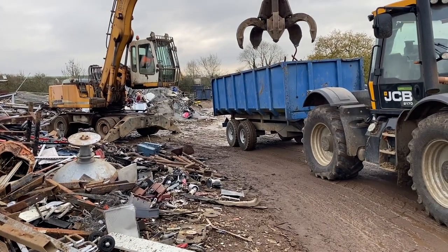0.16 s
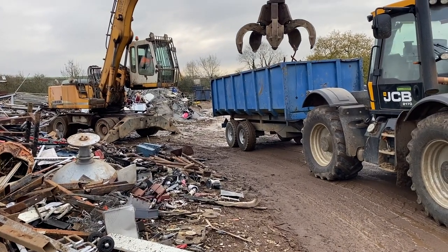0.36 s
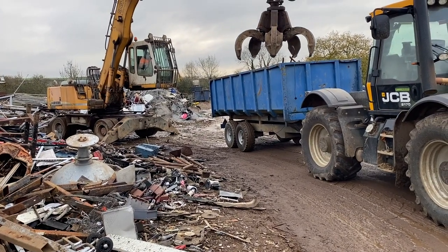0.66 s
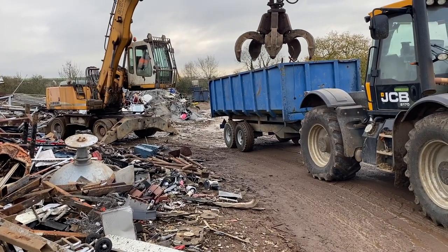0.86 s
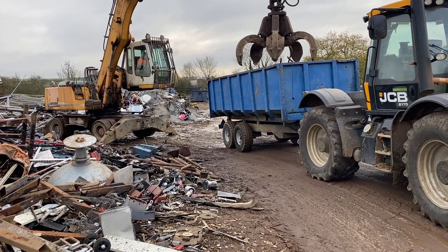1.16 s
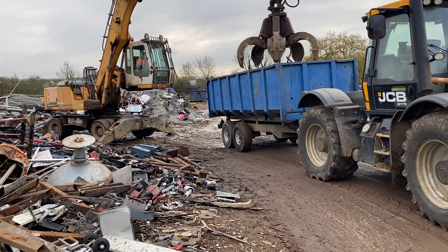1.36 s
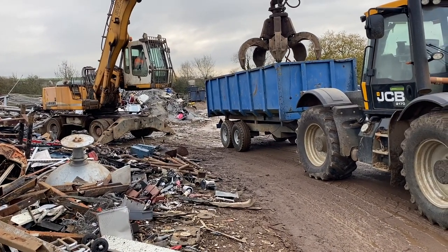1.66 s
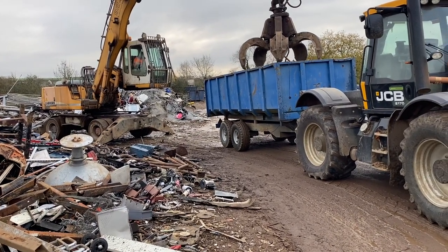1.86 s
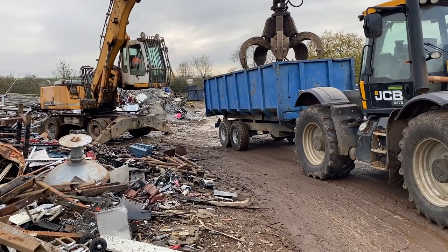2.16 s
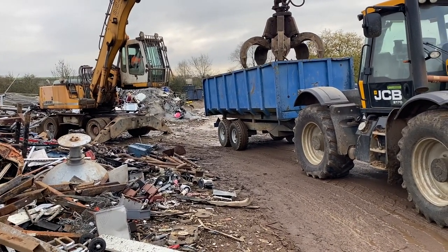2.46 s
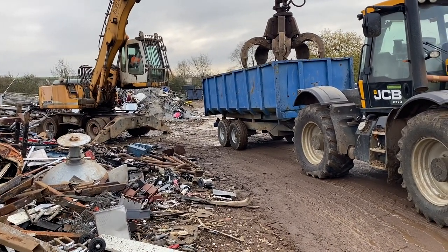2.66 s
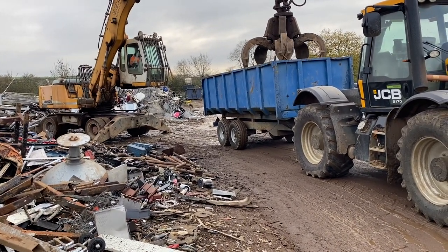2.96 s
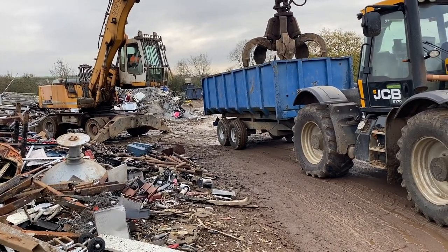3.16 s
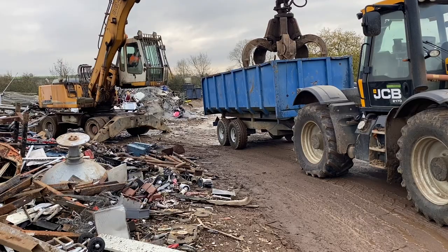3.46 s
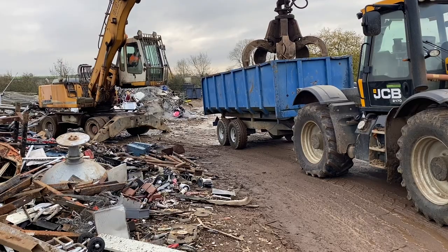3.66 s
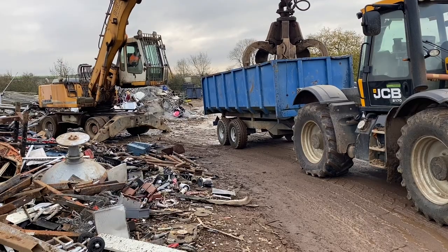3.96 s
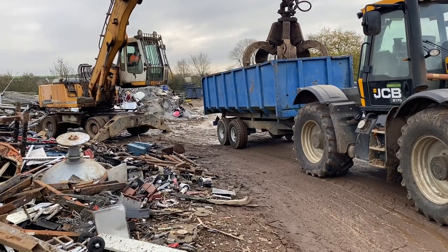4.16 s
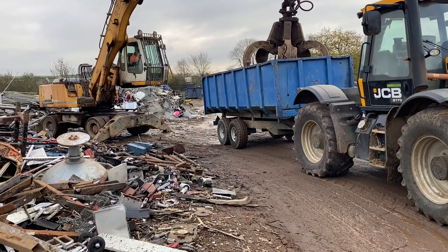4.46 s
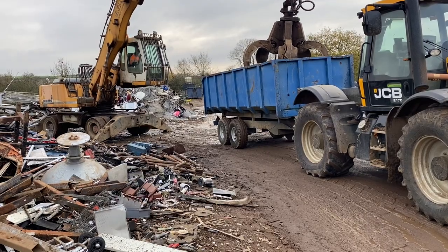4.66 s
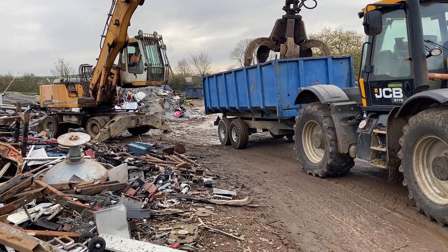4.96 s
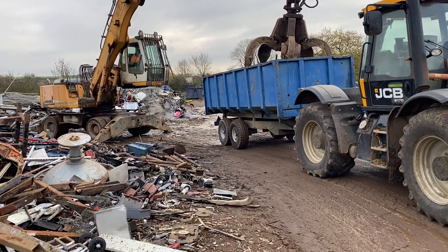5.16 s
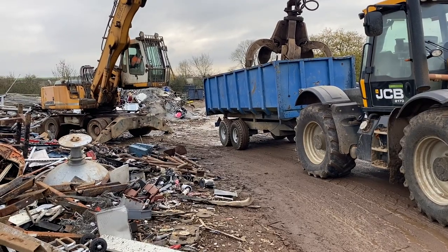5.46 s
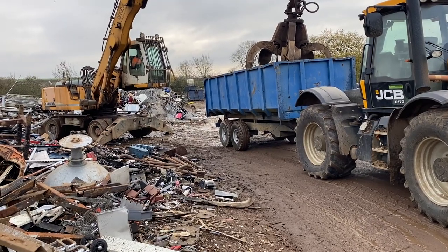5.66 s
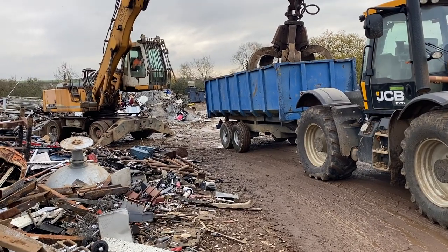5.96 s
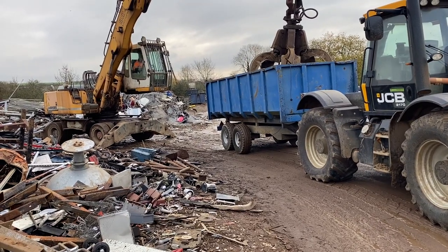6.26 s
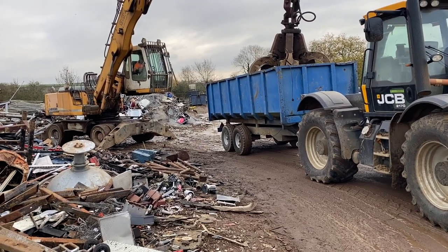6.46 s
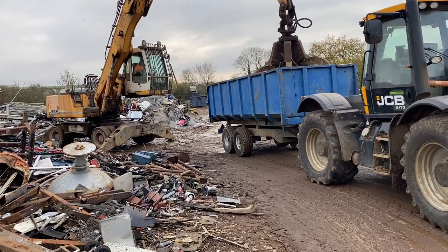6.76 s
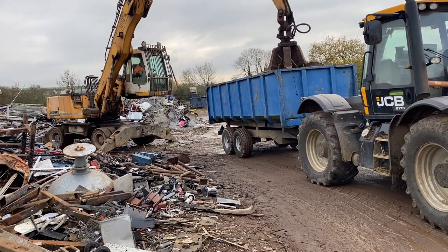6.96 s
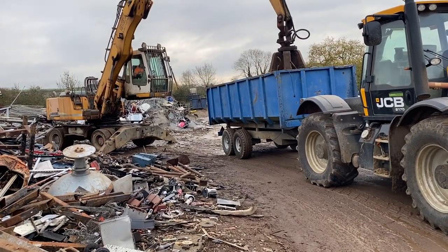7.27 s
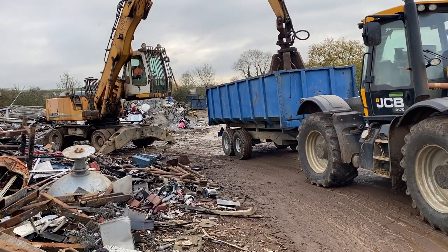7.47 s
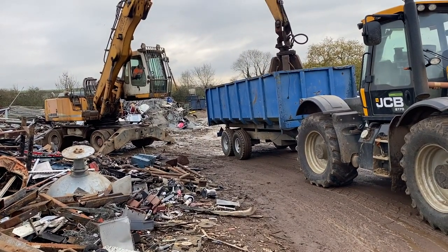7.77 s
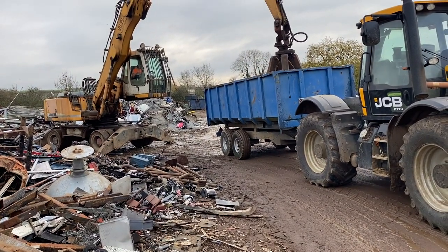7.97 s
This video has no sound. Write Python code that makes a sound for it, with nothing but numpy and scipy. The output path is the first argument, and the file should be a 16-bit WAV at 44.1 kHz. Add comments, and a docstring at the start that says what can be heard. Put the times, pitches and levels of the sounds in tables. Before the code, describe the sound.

A diesel tractor idles close by with a steady rumble and ticking clatter, and an excavator drones further off. After about three seconds a grab starts digging in a steel trailer, bringing hollow booms and dull clanks. The metal then groans, scrapes and crashes, and loose scrap jangles and tumbles through the last seconds. The open scrap yard adds only a short, dull echo.

```python
"""An open scrap yard. Close by on the right a six-cylinder diesel tractor idles, its knocks, ticks and
clatter repeating with each engine cycle. Further off an excavator drones while its grab digs in a steel
trailer: the body booms, pieces clank, snap and scrape, dragged steel groans, and scrap shifts and
tumbles. The yard answers the scrap with a short, dull tail."""
import sys
import numpy as np
from scipy import signal
from scipy.fft import rfft, irfft, next_fast_len
from scipy.io import wavfile
from scipy.ndimage import uniform_filter1d, map_coordinates

SR = 44100
rng = np.random.default_rng(int(sys.argv[2]) if len(sys.argv) > 2 else 0)


def materialize(psi):
    """Save the field psi as 16-bit PCM at rate SR to the path in sys.argv[1].

    A 1-D psi becomes a single channel; in a 2-D psi each row is a channel.
    """
    bounded = np.clip(np.atleast_2d(psi).T, -1, 1)
    quanta = np.round(bounded * 32767).astype(np.int16)
    wavfile.write(sys.argv[1], SR, quanta)


N = 357210

# stereo noise, opposed part against common part: freq_hz, level_db
SIDE_SPECTRUM = [(60, -18), (130, -14.5), (300, -16), (600, -5), (2000, -9.5), (8000, -1)]
# yard decay: freq_hz, t60_s
YARD_DECAY = [(150, 0.75), (1500, 0.26), (9000, 0.15)]

# excavator engine speed: time_s, firing_hz
EXCAVATOR_SPEED = [(0, 100.3), (.5, 100.45), (1.3, 99.7), (2.1, 98.8), (3, 99.5), (3.6, 100.35),
                   (4.4, 99.25), (5, 99.35), (5.5, 100.6), (5.9, 99.6), (6.3, 100.5), (7.2, 100.8),
                   (7.8, 98.9), (8.1, 98.9)]
# nine-piston pump, tone and octave: level_db
HYDRAULIC_LEVELS = [-43, -43.5]
# excavator fans: pitch_hz, level_db, wander_hz
FAN_HUMS = [(54.66, -36.5, 0.34), (117.2, -34.5, 0.28)]

# trailer takes a load: start_s, level_db, panel_over_chassis_db
BOOM_HITS = [(1.36, -26.5, -4), (3.082, -18.5, -10.5), (3.50, -15, -8), (3.569, -21, -21), (4.029, -22, -7),
             (4.43, -21, -6), (5.091, -22, -5.5), (5.56, -16, -4.5), (5.62, -16, -12), (6.379, -16.5, -6.5),
             (6.46, -24, -17), (6.57, -20.5, -4), (6.96, -17.5, 0), (7.73, -14, -6), (8.02, -20.5, -1)]
# trailer chassis: pitch_hz, width_hz, level_db
CHASSIS_MODES = [(53.7, 13.7, 10.5), (69.1, 15.6, 12)]
# trailer side panels: pitch_hz, width_hz, level_db
PANEL_MODES = [(117, 52, 17.5), (161, 51, 9), (200, 16, -42), (276, 44, 11)]
# steel drags on steel: start_s, panel_hz, level_db
GROAN_DRAGS = [(4.755, 161, -24.5), (4.9, 435, -28.5), (5.47, 366, -35), (5.839, 406, -18.5),
               (5.879, 234, -24), (6.012, 413, -27), (6.422, 138, -23), (6.9, 183, -20.5),
               (7.679, 222, -31)]
# scrap slides: middle_s, length_s, level_db
SCRAP_SLIDES = [(4.39, 0.12, -31.5), (5.02, 0.26, -36.5), (5.62, 0.24, -32), (5.89, 0.15, -26),
                (6.567, 0.22, -27), (6.835, 0.097, -24.5), (7.014, 0.33, -16.5), (7.688, 0.28, -17)]
# tumbling scrap, with treble filtered out near 9 and 13 kHz: freq_hz, density_db
HEAP_SPECTRUM = [(70, -28), (130, 2.5), (220, -4), (430, -1.5), (600, -11.5), (950, -8.5), (1500, -19.5),
                 (1950, -13.5), (3200, -24.5), (4500, -25.5), (7700, -36), (9000, -54), (12000, -39.5),
                 (13000, -70)]
# grit, with treble filtered out near 9 and 13 kHz: freq_hz, density_db
GRIT_SPECTRUM = [(1500, -25), (3000, -5), (4200, -1), (6000, -3), (7800, -3), (9200, -28), (11500, -18),
                 (12700, -55)]
# a tine scrapes, then slips off: slip_s, length_s, level_db
TINE_SCRAPES = [(5.853, 0.036, -31), (6.559, 0.057, -25.5)]
# scraping tine: freq_hz, density_db
RASP_SPECTRUM = [(300, -15), (1000, 3), (2000, 2), (4500, -14), (8000, -35), (15000, -55)]
# loose steel tube: pitch_hz, level_db, t60_s
TUBE_MODES = [(1574, -9, .35), (1815, -6, .3), (2040, -2, .42), (2205, -4, .36), (2490, -2.5, .34),
              (2616, -5, .36), (2939, -7, .32), (3245, -8, .36), (3690, -13, .3), (4270, -10, .28),
              (4810, -11.5, .26)]
# blows on the tube: start_s, level_db
TUBE_BLOWS = [(5.778, -38.5), (5.853, -31.5), (5.921, -35), (6.014, -32)]
# small hard pieces snap: start_s, level_db, t60_s
SNAP_HITS = [(4.35, -29, 0.24), (4.559, -41.5, 0.7), (5.503, -36, 0.065), (5.853, -30.5, .06),
             (6.207, -43, 0.63), (7.014, -27, 0.18), (7.277, -36, 0.11), (7.372, -20, 0.14)]
# snap, with treble filtered out near 9 and 13 kHz: freq_hz, density_db
SNAP_SPECTRUM = [(1500, -32), (3000, -8), (3700, -1.5), (4500, 1.5), (5500, -2.5), (6600, -2.5),
                 (7700, -1.5), (9000, -17.5), (11500, -10), (13000, -36), (15500, -23)]
# heavy pieces hit walls and plates: start_s, plate_hz, level_db
PLATE_HITS = [(3.497, 803, -32), (3.504, 520, -37), (3.598, 760, -36), (3.818, 1000, -35),
              (5.853, 900, -24), (6.4, 930, -24.5), (6.555, 995, -19.5), (6.557, 377, -23.5),
              (6.574, 1870, -23.5), (6.795, 950, -22.5), (6.814, 1010, -28), (6.869, 560, -42),
              (6.919, 990, -32), (6.984, 980, -25), (7.039, 1030, -34), (7.089, 814, -30),
              (7.189, 980, -30.5), (7.385, 437, -25.5), (7.534, 1300, -34), (7.599, 1220, -28),
              (7.679, 834, -25), (7.759, 680, -27), (7.821, 1210, -33)]
# steel walls and tines: pitch_hz, level_db, t60_s
STEEL_MODES = [(660, -13, 0.35), (756, -5, 0.3), (842, -5, 0.22), (1040, -8, 0.23), (1805, -5, 0.2),
               (1905, -2, 0.2), (1972, -1, 0.3), (2202, -5.5, 0.4), (2485, -0.5, 0.38), (2560, -6, 0.28),
               (3245, -5.5, 0.42), (3550, -10, 0.25), (4270, -6, 0.22), (4400, -8, 0.25), (4800, -13, 0.33),
               (5330, -15, 0.28), (6530, -17, 0.2)]
# scrap piece, with treble filtered out near 9 and 13 kHz: freq_hz, density_db
PIECE_SPECTRUM = [(100, -6), (200, 6.5), (400, 0.5), (550, -5), (950, 2), (1450, -2.5), (2000, 1),
                  (2900, -7.5), (4500, -10.5), (6000, -19.5), (7600, -21), (9000, -41), (11800, -30),
                  (13000, -69)]
# the grab knocks scrap about: start_s, level_db, treble_db
CLANK_HITS = [(3.499, -21.5, -28), (3.594, -20, -21), (3.819, -17.5, -19), (3.88, -22.5, -6),
              (4.571, -25, 6), (5.0, -21, -13), (5.471, -13.5, -28), (5.506, -19.5, -11),
              (5.557, -14.5, -33), (5.778, -15.5, -2), (5.852, -9.5, 3), (5.921, -18.5, 6),
              (6.014, -17.5, 4), (6.21, -27.5, 28), (6.402, -20.5, 7), (6.556, -3.5, -0.5), (6.565, -11, 2),
              (6.575, -8.5, -17), (6.797, -16, -20), (6.869, -16, -5), (6.983, -14, 9), (7.039, -15, 3),
              (7.087, -18, -6), (7.188, -16, -1), (7.535, -18, -1), (7.598, -13.5, 4), (7.679, -19, 14),
              (7.72, -10.5, 1), (7.822, -12.5, -6)]
# scrap bearing: freq_hz, left_minus_right_db
SCRAP_BALANCE = [(100, 0.0), (500, -2.0), (1000, -5.0), (2200, 1.0), (6000, 0.5)]

# tractor four-stroke cycle rate: time_s, cycle_hz
TRACTOR_SPEED = [(0, 6.25), (3, 6.25), (3.8, 6.205), (5, 6.22), (5.8, 6.25), (8.1, 6.255)]
# exhaust and block tones: cycle_rate_multiple
TONE_ORDERS = [6, 8, 12, 24, 35, 36, 42, 46, 48, 50, 54, 72]
# the same tones: level_db
TONE_LEVELS = [-37, -30.5, -29.5, -35.5, -50, -45.5, -48, -39.5, -33.5, -43.5, -44, -45]
# block rumble: freq_hz, density_db
RUMBLE_SPECTRUM = [(15, -29), (30, -14), (50, 4.5), (95, 11.5), (130, 1.5), (170, -3), (250, 0.5),
                   (340, -0.5), (460, -3.5), (560, -13.5), (740, -7), (830, -17.5), (1050, -9.5),
                   (1600, -101)]
# engine clatter, with treble filtered out near 9 and 13 kHz: freq_hz, density_db
CLATTER_SPECTRUM = [(300, -31), (700, 5), (1100, -3), (1600, 2), (2700, 1), (3600, -14), (5000, -9.5),
                    (6500, -15.5), (8000, -19.5), (8800, -29), (11800, -29.5), (12700, -69), (15500, -64)]
# engine hiss: freq_hz, density_db
HISS_SPECTRUM = [(200, -55), (700, -7), (830, -4.5), (1130, 4), (1500, -1), (2700, -7.5), (3600, -10.5),
                 (4300, -11.5), (5000, -15.5), (7500, -59), (12000, -56), (12700, -75)]
# fuel pump: pitch_hz, width_hz, level_db
FUEL_PUMP_MODES = [(2090, 69, 20), (2140, 170, -18)]
# bonnet panel: pitch_hz, width_hz, level_db
BONNET_MODES = [(293, 20, 0)]
# cylinders in firing order: knock_db, tick_db, clatter_db, knock_lag_cycles
CYLINDER_VOICES = [(-1.5, 9, 5, .045), (-4, -5, 2.5, .01), (1.5, 7, 7.5, .004), (4, -1, 4.5, .006),
                   (-3, 7.5, 6, 0), (-2, -3, 2, .045)]
# tractor bearing: freq_hz, left_minus_right_db
TRACTOR_BALANCE = [(70, -1.5), (180, -2.0), (300, -5.0), (600, 0.5), (1400, -3.5), (2500, 6.0),
                   (4400, 0.5), (7500, 0)]

GRIP_S = 6.16  # the grab grips the load
HALF_LEFT_RIGHT = np.array([[.5], [-.5]])


def amp(db):
    """Decibels to gain."""
    return 10 ** (np.asarray(db) / 20)


def unit(x):
    """Scale to rms 1."""
    return x / np.sqrt(np.mean(x ** 2) + 1e-20)


def along(points, hz):
    """Interpolate (freq_hz, value) points on a log axis."""
    point_hz, values = np.transpose(points)
    return np.interp(np.log(hz + 1), np.log(point_hz + 1), values)


def curve(rows):
    """(time_s, value) rows as one value per sample."""
    return np.interp(np.arange(N) / SR, *np.transpose(rows))


def wobble(rate_hz):
    """Smooth random curve, rate_hz knots a second."""
    knots = rng.standard_normal(int(N * rate_hz / SR) + 4)
    grid = np.arange(0, N, 64)
    return np.interp(np.arange(N), grid, map_coordinates(knots, [grid * rate_hz / SR]))


def fade(t, t60_s):
    """Exponential decay from t = 0."""
    return (t >= 0) * np.exp(-np.log(1000) * np.abs(t) / max(t60_s, 1e-3))


def rise(t, rise_s):
    """Exponential attack, complete after rise_s."""
    return 1 - fade(t, rise_s)


def filtered(x, response):
    """Apply a complex frequency response."""
    size = x.shape[-1]
    padded = next_fast_len(size + SR // 8, True)
    return irfft(rfft(x, padded) * response(np.fft.rfftfreq(padded, 1 / SR)), padded)[..., :size]


def coloured(x, spectrum):
    """Apply a (freq_hz, density_db) spectrum; rms 1."""
    return unit(filtered(x, lambda hz: amp(along(spectrum, hz))))


def resonate(x, modes):
    """Apply parallel (pitch_hz, width_hz, level_db) resonances; rms 1."""
    return unit(filtered(x, lambda hz: sum(
        amp(db) * 1j * hz * width_hz / (pitch_hz ** 2 - hz ** 2 + 1j * hz * width_hz)
        for pitch_hz, width_hz, db in modes)))


def bandpass(x, centre_hz, q):
    """Two equal resonances in series."""
    return filtered(x, lambda hz: 1 / (1 + 1j * (hz / centre_hz - centre_hz / (hz + 1)) * q) ** 2)


def stereo_noise(size, side_db):
    """A common part plus an opposed part that is weak in the bass."""
    mid, side = rng.standard_normal((2, size))
    side = filtered(side, lambda hz: amp(side_db + along(SIDE_SPECTRUM, hz)))
    return unit(np.array([mid + side, mid - side]))


def placed(x, balance, phase_rad):
    """Set left against right in level and phase, by frequency."""
    return filtered(x, lambda hz: amp(HALF_LEFT_RIGHT * along(balance, hz))
                    * np.exp(1j * HALF_LEFT_RIGHT * phase_rad(hz)))


def add(track, start_s, sound):
    """Mix a sound in at start_s."""
    part = track[..., max(round(start_s * SR), 0):][..., :sound.shape[-1]]
    part += sound[..., :part.shape[-1]]


def yard_echo(x):
    """Heaps and machines scatter a short, dull tail."""
    hz, t, bins = signal.stft(rng.standard_normal((2, SR // 2)), SR, nperseg=256)
    decay = np.exp(-np.log(1000) * t / along(YARD_DECAY, hz)[:, None])
    tail = signal.istft(bins * decay, SR, nperseg=256)[1]
    delayed = np.pad(tail / np.linalg.norm(tail[0]), ((0, 0), (SR // 60, 0)))
    return signal.oaconvolve(x, delayed, axes=1)[:, :N]


def excavator(load_db_per_hz=4):
    """Four-cylinder engine, pump and fans. Under load engine and pump sag and the pump tone grows."""
    tone = lambda hz: np.sqrt(2) * np.sin(2 * np.pi * np.cumsum(hz) / SR)
    firing_hz = curve(EXCAVATOR_SPEED)
    firing = amp(-25 + 1.25 * wobble(2.985)) * tone(firing_hz)
    piston_hz = firing_hz * 9 / 4 + .5 * wobble(7)
    pump_db, octave_db = HYDRAULIC_LEVELS
    load_db = load_db_per_hz * (firing_hz.mean() - firing_hz)
    pump = amp(pump_db + load_db + 1.3 * wobble(3.97)) * tone(piston_hz)
    octave = amp(octave_db + 1.3 * wobble(3.97)) * tone(2 * piston_hz)
    fans = sum(amp(db + 0.88 * wobble(7.2)) * tone(hz + wander_hz * wobble(5))
               for hz, db, wander_hz in FAN_HUMS)
    return (firing + pump + octave + fans) * amp(-HALF_LEFT_RIGHT)


def trailer_booms(t60_s=0.6):
    """Chassis and side panels boom under each load."""
    out, t = np.zeros((2, N)), np.arange(SR * 3 // 4) / SR
    for start_s, db, panel_db in BOOM_HITS:
        chassis = unit(sum(
            amp(mode_db) * np.sin(2 * np.pi * (hz + width_hz * rng.uniform(-0.51, 0.505)) * t)
            for hz, width_hz, mode_db in CHASSIS_MODES))
        panels = resonate(stereo_noise(len(t), side_db=-4), PANEL_MODES)
        panels = unit(filtered(panels, lambda hz: 1 / (1 + (hz / 450) ** 4)))
        boom = (chassis + amp(panel_db) * panels) * fade(t, t60_s) * rise(t, 0.088)
        add(out, start_s, amp(db + 3) * boom)
    return out


def panel_groans(slips_per_s=90):
    """Uneven slips of dragging steel drive one panel resonance; lower panels groan longer."""
    out = np.zeros((2, N))
    for start_s, panel_hz, db in GROAN_DRAGS:
        size = round(0.092 * np.sqrt(311 / panel_hz) * SR)
        travel = np.cumsum(rng.exponential(size=size + 1)) * slips_per_s / SR + rng.random()
        slips = np.diff(np.floor(travel)) * rng.standard_normal(size)
        friction = slips + amp(-32) * stereo_noise(size, side_db=6)
        swell = signal.windows.tukey(size, .8)
        add(out, start_s, amp(db) * unit(bandpass(friction, panel_hz, q=4)) * swell)
    return out


def struck_piece(t60_s, uneven_db):
    """Struck scrap: dense modes of uneven strength, the high ones dying first."""
    t = np.arange(SR // 2) / SR
    spectrum = rfft(stereo_noise(len(t), side_db=-4.5))
    strengths = amp(uneven_db * np.minimum(rng.standard_normal(len(t) // 2 + 1), 2))
    modes = unit(irfft(spectrum * strengths))
    low = filtered(modes, lambda hz: 1 / (1 + (hz / 3200) ** 2))
    return low * fade(t, t60_s) + (modes - low) * fade(t, 0.86 * t60_s)


def jangle(contacts_per_s=70, typical_hz=800):
    """Light pieces clank in turn, each with three modes at a pitch of its own."""
    out, t = np.zeros((2, N)), np.arange(SR // 6) / SR
    for slot, draws in enumerate(rng.standard_normal((int(contacts_per_s * N / SR), 9))):
        pitch, detune, force, jitter = draws[0], draws[1:4], draws[4], draws[5]
        phase_rad = .5 * draws[6:8, None]
        modes_hz = np.minimum(typical_hz * np.exp(.5 * pitch + .1 * detune) * [1, 1.6, 2.5], 7500)
        modes = sum(np.sin(2 * np.pi * hz * t + phase_rad) / np.hypot(1, hz / typical_hz)
                    for hz in modes_hz)
        ring = modes * fade(t, 0.24) * rise(t, .005) ** 2
        add(out, (slot + np.tanh(jitter)) / contacts_per_s, amp(5 * np.tanh(force)) * ring)
    return unit(out)


def scrap_motion(rest_db=-42.5, grip_db=-38, growth_db_per_s=5):
    """Envelope: the load stirs ever more as it is gripped and lifted; slides swell on top."""
    t = np.arange(N) / SR
    power = (amp(rest_db) + amp(grip_db + growth_db_per_s * (t - GRIP_S))) ** 2
    for middle_s, length_s, db in SCRAP_SLIDES:
        swell = 0.5 ** np.minimum((2 * (t - middle_s) / length_s) ** 2, 20)
        power += (amp(db) * swell) ** 2
    return np.sqrt(power)


def scrap_tumble(pieces=13, contacts_per_s=18):
    """Ringing pieces collide at random and merge into a coarse rush; grit trickles between them."""
    heap = np.zeros((2, N))
    for _ in range(pieces):
        ring = struck_piece(t60_s=0.17, uneven_db=10.5)
        contacts = rng.random(N) < contacts_per_s / SR
        forces = amp(2.8 * np.minimum(rng.exponential(size=N), 2.5))
        heap += signal.oaconvolve((contacts * forces)[None], ring, axes=1)[:, :N]
    grit = coloured(stereo_noise(N, side_db=1.5) * amp(3.9 * wobble(220)), GRIT_SPECTRUM)
    return scrap_motion() * (coloured(heap, HEAP_SPECTRUM) + amp(-9.5) * jangle() + amp(-19) * grit)


def tine_scrapes():
    """Rough sliding contact swells until the tine slips off."""
    out = np.zeros((2, N))
    for slip_s, length_s, db in TINE_SCRAPES:
        size = round(length_s * SR)
        roughness = amp(3 * unit(uniform_filter1d(rng.standard_normal(size), SR // 500)))
        rasp = coloured(stereo_noise(size, side_db=2) * roughness, RASP_SPECTRUM)
        add(out, slip_s - length_s, amp(db) * rasp * np.linspace(.2, 1, size) ** 2)
    return out


def tube_ring(detune_hz=22):
    """A dented tube is struck; its modes come in close pairs that beat."""
    out, t = np.zeros((2, N)), np.arange(SR * 3 // 4) / SR
    for start_s, db in TUBE_BLOWS:
        for hz, mode_db, t60_s in TUBE_MODES * 2:
            detune, phase, scatter_db = rng.standard_normal(3)
            turns = (hz + detune_hz * np.tanh(detune)) * t + phase
            mode = np.sin(2 * np.pi * turns + .5 * rng.standard_normal((2, 1)))
            add(out, start_s, amp(db + mode_db + scatter_db) * mode * fade(t, t60_s) * rise(t, 0.0075))
    return out


def snaps():
    """Small hard pieces crack, short and bright."""
    out, t = np.zeros((2, N)), np.arange(SR // 3) / SR
    for start_s, db, t60_s in SNAP_HITS:
        crack = coloured(stereo_noise(len(t), side_db=-4), SNAP_SPECTRUM)
        add(out, start_s, amp(db) * crack * fade(t, t60_s) * rise(t, 0.0019))
    return out


def plate_knocks(t60_s=0.27):
    """A blunt blow rings a steel plate in a narrow, hollow band."""
    out, t = np.zeros((2, N)), np.arange(SR // 3) / SR
    for start_s, plate_hz, db in PLATE_HITS:
        shaking = stereo_noise(len(t), side_db=-9) * fade(t, t60_s)
        ring = bandpass(shaking, plate_hz, q=2.85)
        add(out, start_s, amp(db) * ring / np.std(ring[:, :SR // 50]))
    return out


def steel_ring():
    """Walls and tines ring at new strengths with every blow."""
    t = np.arange(SR // 2) / SR
    ring = np.zeros((2, len(t)))
    for hz, db, t60_s in STEEL_MODES:
        strength, phase = rng.standard_normal(2)
        mode = np.sin(2 * np.pi * (hz * t + phase) + .5 * rng.standard_normal((2, 1)))
        ring += amp(db + 1.9 * np.tanh(strength)) * fade(t, t60_s) * mode
    return ring * rise(t, 0.011) ** 2


def grab_clanks(loose_t60_s=0.24, gripped_t60_s=0.15, grip_damping_db=9.5):
    """A struck piece cracks, strikes again and rings the steel around it; the grip damps both rings."""
    out = np.zeros((2, N))
    for start_s, db, treble_db in CLANK_HITS:
        gripped = start_s > GRIP_S
        t60_s = gripped_t60_s if gripped else loose_t60_s
        hit = struck_piece(t60_s, uneven_db=9)
        hit += amp(3) * struck_piece(t60_s=.05, uneven_db=3.5)  # hard first contact
        bounce_s = rng.uniform(.008, .02)
        add(hit, bounce_s, amp(-10.5) * struck_piece(0.97 * t60_s, uneven_db=10))
        shelf = [(700, 0), (4000, treble_db)]
        hit = filtered(hit, lambda hz: amp(along(PIECE_SPECTRUM, hz) + along(shelf, hz)))
        hit = rise(np.arange(hit.shape[1]) / SR, .005) * hit / np.std(hit[:, :SR // 50])
        ring_db = -10.5 + 0.7 * treble_db - grip_damping_db * gripped
        add(out, start_s, amp(db - 9) * (hit + amp(ring_db) * steel_ring()))
    return out


def cylinder_blows(cycle, cylinder_db, slap_db, scatter_db, lag_cycles=0, slap_lag_cycles=.052):
    """Sample positions and sizes of each firing and the piston slap after it."""
    firings = .007 + lag_cycles + np.arange(len(CYLINDER_VOICES)) / len(CYLINDER_VOICES)
    at_cycles = np.arange(int(cycle[-1]) + 1)[:, None] + np.append(firings, firings + slap_lag_cycles)
    levels_db = np.append(cylinder_db, cylinder_db + slap_db)
    sizes = amp(levels_db + scatter_db * np.clip(rng.standard_normal(at_cycles.shape), -2, 1))
    return np.searchsorted(cycle, at_cycles.ravel()), sizes.ravel()


def engine_pings(blows, hz, spread, t60_s, rise_s, slip_rad, count):
    """Each blow rings its own few close modes, alike in every cycle but for a slip of phase."""
    at, sizes = blows
    t = np.arange(SR // 18) / SR
    per_cycle = 2 * len(CYLINDER_VOICES)
    voice = np.arange(len(at)) % per_cycle
    modes_hz = hz * (1 + spread * rng.uniform(-1.01, 1, (per_cycle, count, 1)))
    modes = np.exp(2j * np.pi * modes_hz * t) * fade(t, t60_s) * rise(t, rise_s) ** 2
    phases_rad = rng.uniform(0, 2 * np.pi, (per_cycle, count))[voice]
    phases_rad += slip_rad * rng.standard_normal((len(at), count))
    rings = sum((np.exp(1j * phases_rad[:, k:k + 1]) * modes[voice, k]).real for k in range(count))
    rings *= sizes[:, None] / rings.std(axis=1, keepdims=True)
    samples = at[:, None] + np.arange(len(t))
    return unit(np.bincount(samples.ravel(), rings.ravel())[:N])


def engine_bursts(blows, t60_s):
    """Each blow shakes out a short burst of noise."""
    at, sizes = blows
    t = np.arange(SR // 8) / SR
    envelope = fade(t, t60_s) * rise(t, 0.017) ** 2
    power = signal.oaconvolve(np.bincount(at, sizes ** 2, N + 1), envelope ** 2)[:N]
    return stereo_noise(N, side_db=12.5) * np.sqrt(np.abs(power))


def block_rumble(cycle):
    """The block shakes, partly at random, partly the same in every cycle."""
    one_cycle = rng.standard_normal(SR // 6)
    repeating = one_cycle[(cycle % 1 * len(one_cycle)).astype(int)]
    return coloured(stereo_noise(N, side_db=6) + amp(-6.5) * repeating, RUMBLE_SPECTRUM)


def tractor(left_lag_s=0.227e-3):
    """Exhaust tones, rumble and hiss; block knock, injector ticks and clatter follow the crankshaft."""
    cycle = np.cumsum(curve(TRACTOR_SPEED)) / SR
    knock_db, tick_db, clatter_db, knock_lag_cycles = np.transpose(CYLINDER_VOICES)
    tones = sum(np.sqrt(2) * amp(db + 0.2 * wobble(2.91)) * np.sin(2 * np.pi * (k * cycle + rng.random()))
                for k, db in zip(TONE_ORDERS, TONE_LEVELS))
    rumble = amp(-28) * block_rumble(cycle)
    blows = cylinder_blows(cycle, knock_db, slap_db=-4, scatter_db=1.3, lag_cycles=knock_lag_cycles)
    knock = engine_pings(blows, hz=1235, spread=.06, t60_s=.029, rise_s=.015, slip_rad=.8, count=3)
    blows = cylinder_blows(cycle, tick_db / 2, slap_db=-4, scatter_db=1.5)
    injectors = engine_pings(blows, hz=4215, spread=.02, t60_s=.075, rise_s=.006, slip_rad=2, count=4)
    blows = cylinder_blows(cycle, tick_db, slap_db=-3, scatter_db=6)
    rattle = engine_pings(blows, hz=4400, spread=.035, t60_s=.045, rise_s=.014, slip_rad=2, count=4)
    beats = amp(-37) * knock + amp(-51) * injectors + amp(-48.2) * rattle
    blows = cylinder_blows(cycle, clatter_db, slap_db=-9, scatter_db=2, lag_cycles=-.016)
    clatter = amp(-42) * coloured(engine_bursts(blows, t60_s=0.13), CLATTER_SPECTRUM)
    bonnet = amp(-45) * resonate(engine_bursts(blows, t60_s=0.25), BONNET_MODES)
    strokes = amp(-6 * np.cos(4 * np.pi * cycle))  # one per crankshaft turn
    fuel_pump = amp(-49) * resonate(stereo_noise(N, side_db=14) * strokes, FUEL_PUMP_MODES)
    hiss = amp(-37) * coloured(stereo_noise(N, side_db=-3), HISS_SPECTRUM)
    engine = tones + rumble + bonnet + beats + clatter + fuel_pump + hiss
    return placed(engine, TRACTOR_BALANCE, lambda hz: -2 * np.pi * hz * left_lag_s)


def scene(reflection_s=0.001, ripple_rad=0.3):
    """Both machines, trailer, scrap and echo. A near reflection ripples the scrap's stereo phase."""
    scrap = grab_clanks() + plate_knocks() + tube_ring() + tine_scrapes()
    scrap += scrap_tumble() + panel_groans()
    ripple = lambda hz: ripple_rad * np.cos(2 * np.pi * hz * reflection_s)
    scrap = placed(scrap, SCRAP_BALANCE, ripple) + snaps()
    return tractor() + excavator() + trailer_booms() + scrap + amp(-21.5) * yard_echo(scrap)


def record(dry):
    """Peaks round off near full scale; nothing above 15.7 kHz."""
    rounded = dry / (1 + np.abs(dry) ** 8) ** (1 / 8)
    return filtered(rounded, lambda hz: hz < 15700)


dry = scene()
out = record(dry)
materialize(out)
```